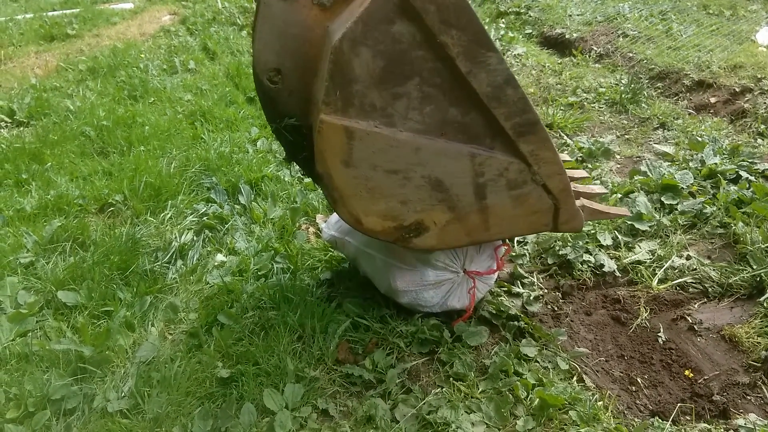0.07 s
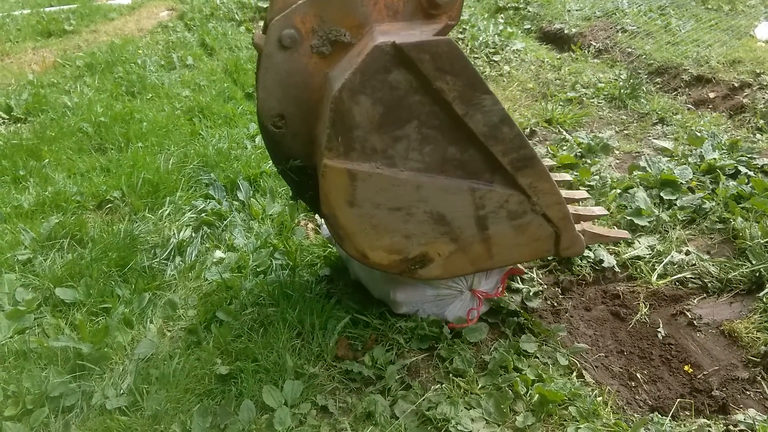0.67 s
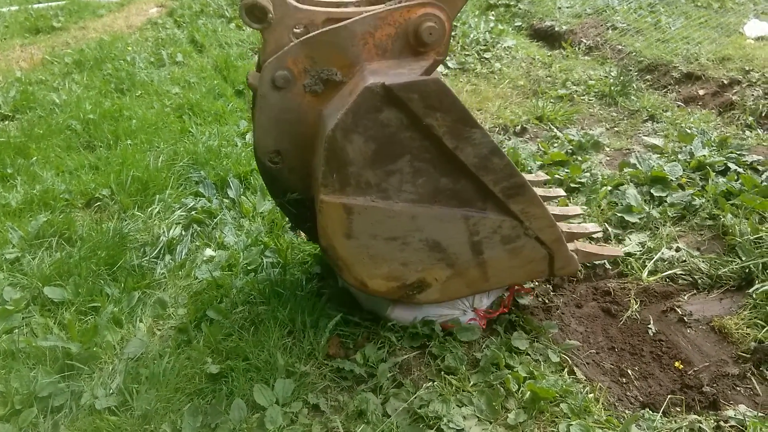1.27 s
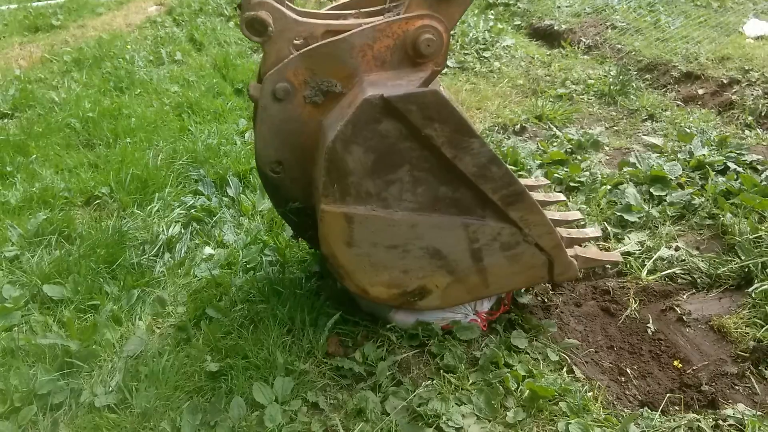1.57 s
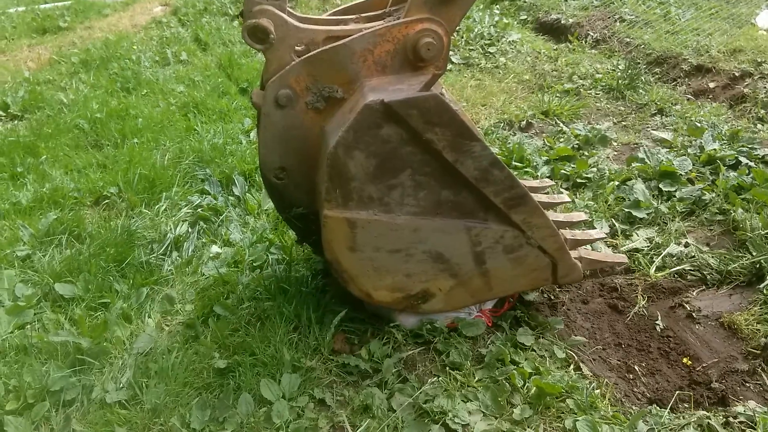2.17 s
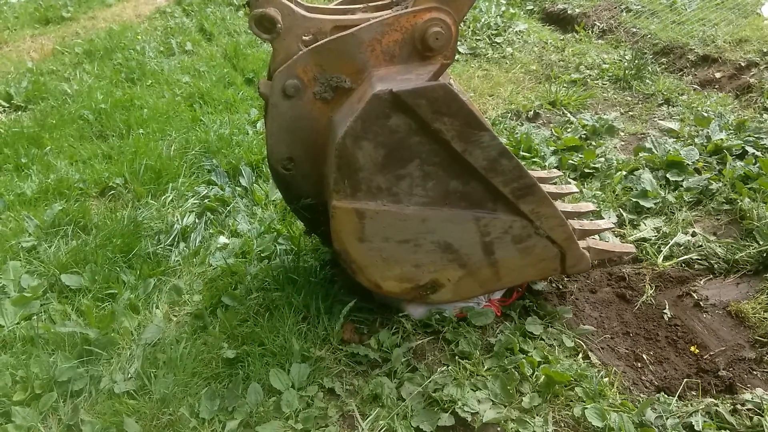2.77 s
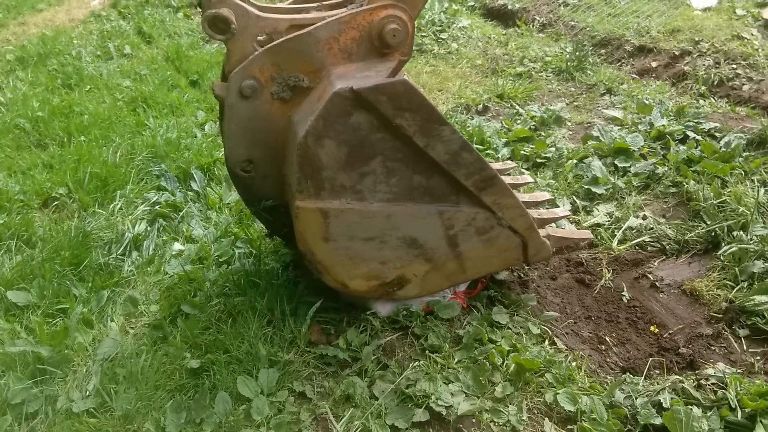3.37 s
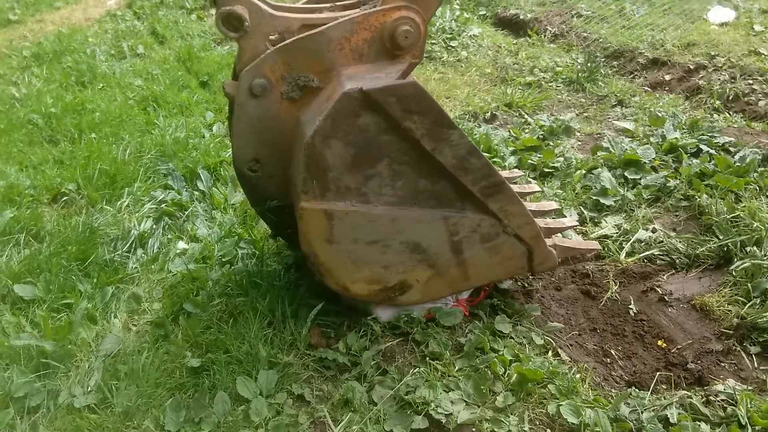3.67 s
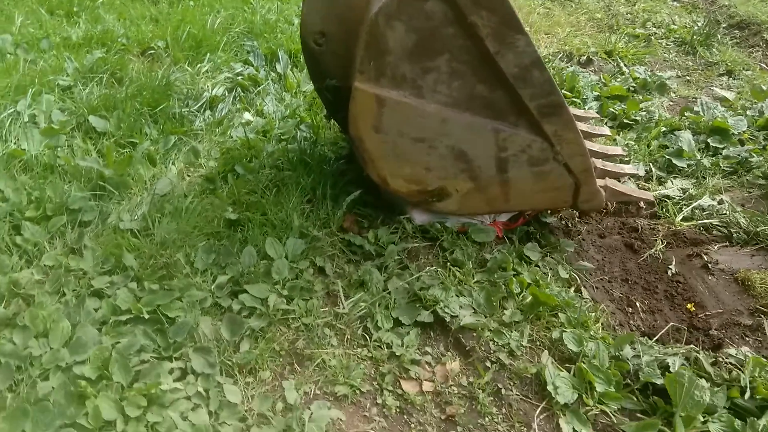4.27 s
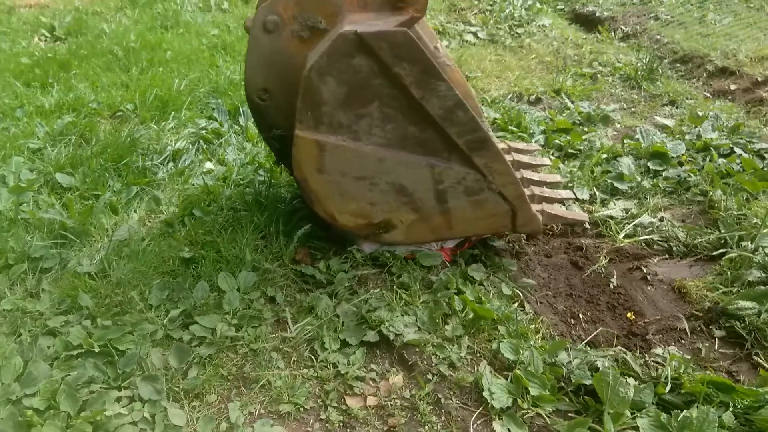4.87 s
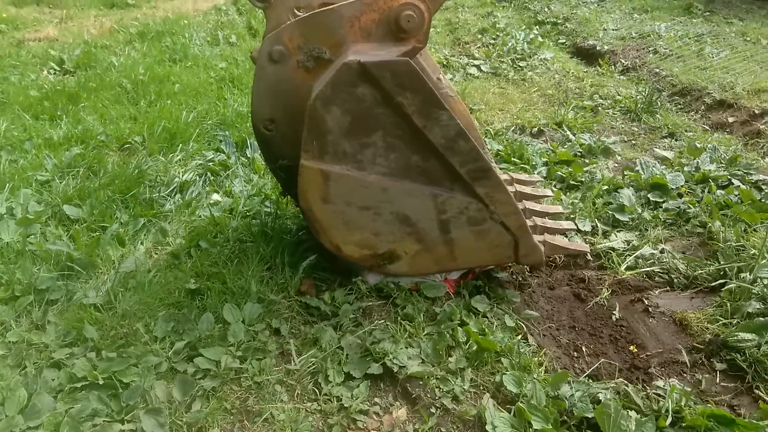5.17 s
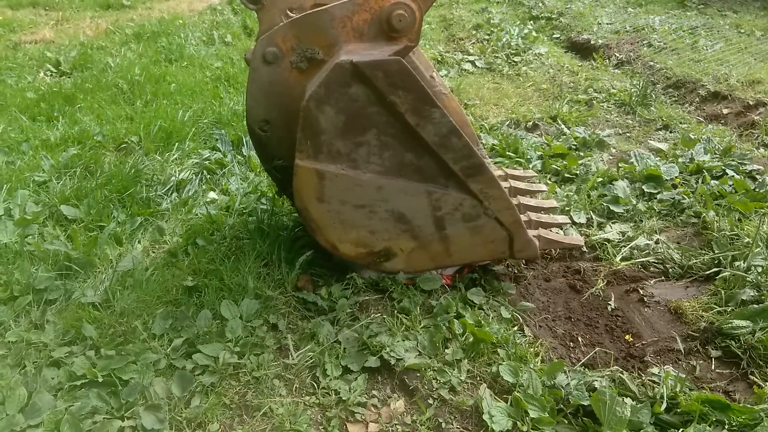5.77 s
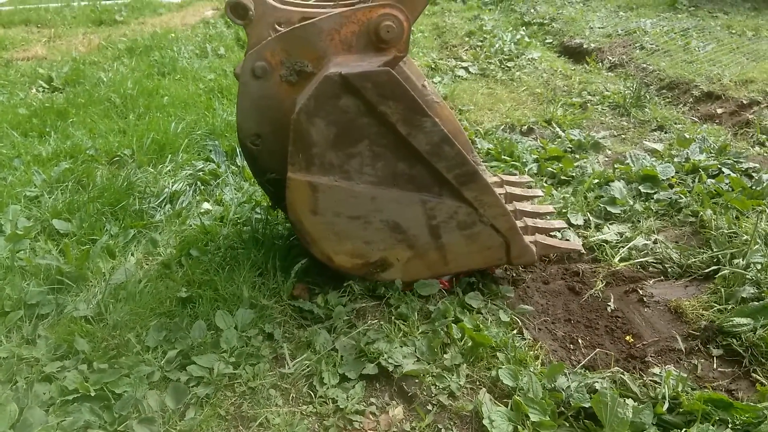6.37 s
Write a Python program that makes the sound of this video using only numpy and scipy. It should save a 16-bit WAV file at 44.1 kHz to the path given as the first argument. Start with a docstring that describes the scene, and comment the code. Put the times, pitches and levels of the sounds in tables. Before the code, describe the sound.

Metal cans crunch and snap under an excavator bucket, over the steady hum of an idling diesel engine.

```python
"""Metal cans crunch, then snap one by one, over the hum of an idling diesel a few metres away.
An excavator bucket is pressing a sack of them flat on a lawn. Many tiny buckles make the dense crunch;
single can walls make the snaps, which the sack and its load damp quickly. Oil hisses through a valve
during two pushes. Near the end the bucket bears on the ground: the hiss grows, the engine slows a little."""
import sys
import numpy as np
from scipy import signal
from scipy.fft import rfft, irfft, next_fast_len
from scipy.io import wavfile
from scipy.ndimage import uniform_filter1d, minimum_filter1d

SR = 44100
rng = np.random.default_rng(int(sys.argv[2]) if len(sys.argv) > 2 else 0)


def pcm_store(signal):
    """Save signal as 16-bit PCM."""
    levels = np.round(np.clip(np.atleast_2d(signal), -1, 1) * 32767)
    wavfile.write(sys.argv[1], SR, levels.astype(np.int16).T)


N = 291942

# tones of the machine's hum, from exhaust and hydraulic pump: multiple_of_crankshaft_rate, idle_db, loaded_db
HUM_TONES = [(2, -9, -10), (3, -12, -14), (3.5, -20, -23), (3.75, -19, -19), (4, 0, 0), (4.5, -26, -20),
             (5, -14, -7), (6, -20, -18), (7, -26, -15), (8, -32, -25), (9, -30, -24), (10, -27, -17),
             (12, -33, -26), (15, -37, -29)]
# rumble of uneven combustion: frequency_hz, level_db
RUMBLE_COLOUR = [(20, -40), (42, -8), (60, 24), (72, -30.5), (105, -3), (135, -0.5), (180, -6.5),
                 (230, -13.5), (300, -11.5), (400, -21), (600, -44)]
# clatter in the engine bay: frequency_hz, level_db
CLATTER_COLOUR = [(88, -32.5), (150, -13), (283, -15.5), (364, -17.5), (416, -20), (477, -19.5), (612, -17),
                  (900, -18), (1540, -28), (1910, -19.5), (2970, -26.5), (3820, -39.5), (4720, -36),
                  (13600, -61), (15000, -79)]
# how wide the clatter sounds: frequency_hz, side_minus_middle_db
CLATTER_WIDTH = [(200, 3.5), (380, -4), (700, -3), (1250, 11), (2400, -8.5), (4400, 2), (8000, 6)]
# which way the engine leans: frequency_hz, left_minus_right_db
ENGINE_PAN = [(200, -1.7), (400, -2), (700, -4), (1300, -1.5), (2400, 1), (8000, 2), (15000, 6)]
# hiss of oil in the valve: frequency_hz, level_db
HISS_COLOUR = [(500, -3), (1500, 8), (3000, 1.5), (4600, 6.5), (6200, 0), (7200, 1.5), (9500, -8.5),
               (12500, 2), (15000, -18.5)]
# the valve is open while the bucket pushes down: start_s, end_s
PUSHES = [(0.12, 2.31), (4.33, 6.9)]
# the sack gives way on the soil: start_s, level_db, pitch_hz
SACK_THUDS = [(1.404, -3, 76), (1.43, -11, 129.1), (1.50, -28, 45), (1.81, -27, 35), (3.775, -18.5, 258)]
# a whole can dents with a hollow pop: start_s, level_db, pitch_hz
CAN_DENTS = [(0.592, -10.5, 766), (1.469, -13, 890), (1.788, -15, 710), (2.048, -13.5, 604),
             (2.878, -23, 735), (4.394, -13, 680), (4.492, -11.5, 535), (4.597, -13.5, 610),
             (5.14, -16, 605), (5.392, -22, 635), (5.622, -7, 605), (5.68, -18, 796), (5.853, -11, 746),
             (6.166, -18.5, 746)]
# crunch of collapsing cans: frequency_hz, level_db
CRUNCH_COLOUR = [(120, -18), (200, -2.5), (244, 3), (338, 1), (443, -11), (671, -6.5), (880, -4.5),
                 (1050, -12.5), (1490, -5.5), (3010, -6.5), (4240, -17.5), (7550, -11), (9380, -20),
                 (13700, -21), (15000, -35)]
# grinding of flattened cans: frequency_hz, level_db
GRIND_COLOUR = [(250, -2), (700, 2), (2000, -5), (4200, 2), (8000, -11.5), (14000, -11)]
# a further squeeze grinds the flat cans together: peak_s, level_db
GRIND_SQUEEZES = [(4.48, -24.5), (5.42, -21.5), (5.87, -25.5), (6.15, -28), (6.6, -48)]
# a can wall buckles: start_s, level_db, body_db, crack_db, wall_pitch_hz
CAN_SNAPS = [(0.3175, -16, -6, -15, 1520), (0.3561, -14, -5, -19, 2780), (0.381, -5.5, -19, -12, 1135),
             (0.4165, -16, -20, -8.5, 1510), (0.5028, -12.5, -17, -7.5, 1650), (0.5921, -7, -6.5, -6, 1820),
             (0.6122, -11, -17, -16, 2220), (0.6313, -1.5, -14, -7, 1320), (0.6444, -9, -18, -7, 2240),
             (0.7512, -7, -10, -6.5, 2620), (0.7851, -7.5, -25, -5.5, 2960), (0.823, -8, -20, -4.5, 3160),
             (0.8827, -10.5, -7, -10, 2030), (0.9, -5.5, -9, -7, 1500), (0.9192, -13, -15, -8, 2470),
             (0.956, -15, -16, -4, 1370), (0.9855, -16, -12, -2, 2550), (1.1235, -7.5, -3, -10, 1760),
             (1.1608, -6.5, -9, -8, 1880), (1.277, -8, -14, -13, 1740), (1.3316, -6, -9, -8.5, 2910),
             (1.4327, -4, -9, -9, 1420), (1.4689, -7.5, -6, -7, 2810), (1.511, -3, -12, -10.5, 2850),
             (1.764, -9, -11, -12, 1880), (1.8049, -10.5, -13, -6, 1880), (1.8407, -10, -13, -12, 1700),
             (1.8809, -18, -18, -11, 1790), (1.9063, -10, -11, -12, 1920), (1.9504, -14, -2, -12, 1540),
             (1.9662, -11.5, -13, -14, 2440), (2.0097, -7.5, -28, -9.5, 1990),
             (2.0457, -18, -7, -3.5, 1910), (2.1276, -24, -6, -6, 1250), (2.2421, -9.5, -18, -9.5, 1525),
             (2.4074, -19.5, -4, -15, 1920), (2.5326, -16.5, -19, -2.5, 2090), (2.5534, -23, -15, -5, 1230),
             (2.6689, -17.5, -8, -6.5, 2400), (2.828, -15, -7, -8, 2130), (2.8779, -10.5, -4, -5.5, 2260),
             (3.1682, -23.5, -5, -9, 2230), (3.1984, -27, -8, -8, 2060), (3.2226, -8, -14.5, -5.5, 1570),
             (3.2902, -23, -16, -7, 1780), (3.3118, -8, -8, -11, 1600), (3.4174, -19.5, -12, -8, 1760),
             (3.686, -10, -23, -15, 1575), (3.7827, -24.5, -3, -10, 2300), (3.8363, -14.5, -17, -11, 2310),
             (3.907, -17.5, -9, -8.5, 2820), (3.9559, -8, -15, -13.5, 3150), (4.052, -9.5, -19, -22, 1790),
             (4.135, -24, -16, -6, 1490), (4.1432, -24.5, -23, -3.5, 1530), (4.2316, -21.5, -17, -13, 2000),
             (4.2602, -15.5, -21, -12, 2300), (4.337, -14, -27, -2.5, 1680),
             (4.3776, -14.5, -6, -7.5, 2950), (4.3939, -10, -4.5, -3, 2060), (4.4518, -17, -9, -11, 2400),
             (4.4763, -12, -19, -8.5, 1480), (4.493, -9.5, -17, -10.5, 2050),
             (4.539, -21.5, 3.5, 0.5, 2100), (4.5528, -11, -16, -8, 2770), (4.5964, -14, -2, -11, 3260),
             (4.674, -15.5, -15, -7.5, 1440), (4.7437, -13.5, -14, -5.5, 1430), (4.8675, -24, -16, 4, 1480),
             (5.1386, -11.5, -20, -4, 1980), (5.3326, -26, -14, 0.5, 1500), (5.3602, -7, -21, -14, 1440),
             (5.3932, -11.5, -8, -9, 1100), (5.4014, -5, -11, -17, 1550), (5.437, -13.5, -5, -6, 2460),
             (5.5048, -15, -8, -7, 1880), (5.569, -13.5, -8, -9.5, 2610), (5.6216, -9, -5.5, -9, 2100),
             (5.6382, -13, -22, -12, 1760), (5.6808, -12, -9, -8.5, 2020), (5.7287, -20, -1, -12, 2060),
             (5.8484, -16.5, 1.5, -2, 1470), (5.883, -20, -2, -9, 1570), (5.892, -13.5, -8, -7, 1600),
             (5.9218, -11, -17, -15, 2470), (5.9693, -12, -26, -12, 3020), (6.1175, -13, 0.5, -7, 2330),
             (6.126, -14, -12, -19, 2160), (6.1656, -11.5, -8, -6.5, 2400), (6.194, -14.5, -23, -15, 1470),
             (6.2348, -14.5, -16, -3.5, 2880), (6.327, -25, -11, -3, 2480),
             (6.4211, -21.5, -11, -0.5, 2430), (6.477, -23, -13, -4, 2430), (6.6082, -14.5, -2, -7, 2000)]
# a snap's hollow body: frequency_hz, level_db
BODY_COLOUR = [(200, -17), (450, -20), (700, -7), (1100, -21.5), (2000, -53)]
# a snap's rattling wall: frequency_hz, level_db
WALL_COLOUR = [(600, -31), (1400, -1), (2800, -4.5), (4300, -8), (6000, -8), (10000, -53)]
# a snap's sharp crack: frequency_hz, level_db
CRACK_COLOUR = [(2000, 1), (4200, -3.5), (6500, 4.5), (9300, 2.5), (12000, 6), (14000, 3), (16000, 0.5)]
# which way the cans and hiss lean: frequency_hz, left_minus_right_db
BUCKET_PAN = [(300, -2), (700, -4), (1300, .5), (2400, 1.5), (4400, 1), (8000, 5.5), (14000, 11)]

TIME = np.arange(N) / SR
AGE = np.arange(4096) / SR  # seconds since one short sound began
SIDES = np.array([[1], [-1]])  # plus for left, minus for right


def undb(db):
    """Turn decibels into a number to multiply by."""
    return 10 ** (np.asarray(db) / 20)


def unit(x):
    """Scale a sound to an average (rms) strength of 1."""
    return x / np.sqrt(np.mean(x ** 2))


def shape(points, size):
    """Read a (frequency_hz, level_db) table at every frequency of a spectrum."""
    hz, db = np.transpose(points)
    return np.interp(np.log(np.fft.rfftfreq(size, 1 / SR) + 1), np.log(hz), db)


def colour(x, points):
    """Give a sound the balance of lows and highs listed in a table."""
    cepstrum = irfft(shape(points, size=2048) * np.log(10) / 20)[:1024]
    cepstrum[1:] *= 2  # makes the filter ring only after a sound, never before
    response = irfft(np.exp(rfft(cepstrum, 2048)))[:1024]
    return signal.fftconvolve(x, response[None], axes=-1)[:, :x.shape[-1]]


def pan(x, points):
    """Lean each frequency of a stereo sound left or right."""
    size = next_fast_len(N)
    return irfft(rfft(x, size) * undb(SIDES * shape(points, size) / 2), size)[:, :N]


def wander(per_s):
    """A smooth random wobble, roughly 1 in size."""
    hold = max(int(SR / per_s), 1)
    steps = np.repeat(rng.standard_normal(N // hold + 1), hold)
    return 1.3 * uniform_filter1d(uniform_filter1d(steps, hold), hold)[:N]


def add(out, start_s, sound):
    """Mix a sound in at its start time."""
    i = int(np.clip(start_s * SR, 0, N - 1))
    out[:, i:i + sound.shape[-1]] += sound[:, :N - i]


def fade(t60, rise):
    """Swell in about `rise` seconds and die away by 60 dB every `t60` seconds."""
    return (1 - np.exp(-AGE / rise)) * undb(-60 * AGE / t60)


def ring(hz, t60, glide, spread):
    """One fading tone; it slides as the material bends and reaches the two sides out of step."""
    turns = hz * (AGE + glide * AGE ** 2 / t60) + spread * rng.standard_normal((2, 1))
    return np.sin(2 * np.pi * turns) * fade(t60, rise=0.00026)


def machine_load(start_s=4.7, takes_s=1.9):
    """Strain on the machine, 0 to 1, as the bucket comes to bear on the ground."""
    return np.clip((TIME - start_s) / takes_s, 0, 1) ** 1.45


def engine(idle_hz=27.56, sag_hz=2.6):
    """Four cylinders hum and rumble, clatter pulses with the crankshaft, and load slows the shaft."""
    load = machine_load()
    shaft_hz = (idle_hz - sag_hz * load) * (1 + .003 * wander(3.07))
    turns = np.cumsum(shaft_hz) / SR
    hum = 0
    for multiple, idle_db, loaded_db in HUM_TONES:
        waver = .08 if multiple in (2, 4) else .22  # the main firing tones are steadiest
        phase = 2 * np.pi * (multiple * turns + rng.random())
        tone = (1 + waver * wander(14)) * np.sin(phase) + waver * wander(15) * np.cos(phase)
        hum = hum + undb(idle_db + load * (loaded_db - idle_db)) * tone
    hum = unit(hum) * undb(-11.5 - load)
    rumble = unit(colour(rng.standard_normal((1, N)), RUMBLE_COLOUR)) * undb(-30 + 5 * load)
    middle, side = colour(rng.standard_normal((2, N)), CLATTER_COLOUR)
    clatter = unit(middle + SIDES * colour(side[None], CLATTER_WIDTH))
    pulse = 1 + .17 * np.cos(6 * np.pi * turns) + .13 * np.cos(4 * np.pi * turns)
    flicker_db = 1.26 * wander(24.64) + 1.23 * wander(160)
    return pan(hum + rumble + clatter * pulse * undb(-30 + flicker_db), ENGINE_PAN)


def valve_hiss(ramp_s=.2, flicker_db=4):
    """Oil hisses through the open valve, louder as the pressure builds."""
    opening = sum(np.clip(np.minimum(TIME - start, end - TIME) / ramp_s + .5, 0, 1)
                  for start, end in PUSHES)
    level_db = -41.5 + 7 * np.minimum(machine_load() / .39, 1)
    hiss = unit(colour(rng.standard_normal((2, N)), HISS_COLOUR))
    return hiss * opening * undb(level_db + flicker_db * wander(30))


def dents_and_thuds():
    """Whole cans dent with hollow pops, and the sack thuds dully on the soil."""
    out = np.zeros((2, N))
    for start_s, db, hz in CAN_DENTS:
        pop = ring(hz, t60=0.034, glide=-0.062, spread=0.049)
        overtone = undb(-7) * ring(1.394 * hz, t60=0.048, glide=-0.086, spread=0.32)
        add(out, start_s, undb(db + 1) * (pop + overtone))
    for start_s, db, hz in SACK_THUDS:
        thud = ring(hz, t60=0.37, glide=-0.31, spread=.01) * (1 - AGE / AGE[-1])
        add(out, start_s, undb(db) * thud)
    return out


def creases(start_s, end_s, points, count, scatter_db, t60, ting_db):
    """A swarm of tiny buckles, each a tick, a wall tone and a high ting, at an even overall level."""
    out = np.zeros((2, N))
    for i, (when, size, pitch, bend, high) in enumerate(rng.random((count, 5))):
        tick = rng.standard_normal((2, len(AGE))) * fade(t60, rise=0.00078)
        tone = undb(-10) * ring(550 * 7 ** pitch, t60=.03, glide=.2 * (bend - .5), spread=.2)
        ting = undb(ting_db) * ring(3800 + 10000 * high, t60=.02, glide=0, spread=.3)
        at_s = start_s + (end_s - start_s) * (i + 2 * when) / count
        add(out, at_s, undb(scatter_db * size ** 3) * (tick + tone + ting))
    middle, side = out.mean(axis=0), (out[0] - out[1]) / 2
    side = colour(side[None], [(200, -18), (600, -8), (1300, 0)])  # low sounds reach both sides alike
    out = colour(middle + SIDES * side, points)
    power = uniform_filter1d(np.mean(out ** 2, axis=0), int(.08 * SR))
    return out / np.sqrt(np.abs(power) + 1e-6)


def grinding(rise_db_per_s=128, fall_db_per_s=77):
    """Flattened cans settle faintly and grind together at each further squeeze."""
    swells = sum(undb(db - np.maximum(rise_db_per_s * (peak_s - TIME), fall_db_per_s * (TIME - peak_s)))
                 for peak_s, db in GRIND_SQUEEZES)
    crackle = creases(2, N / SR, GRIND_COLOUR, count=600, scatter_db=21, t60=.016, ting_db=-8)
    return crackle * (undb(-47) + swells)


def crunch(full_s=.87, thins_s=1.323, stops_s=1.89, gives_s=.585):
    """The sack of cans collapses in a dense crackle, brighter when louder."""
    effort_db = -24.5 * np.maximum(full_s - TIME, 0)  # swells, then holds
    effort_db -= 7.5 * np.maximum(TIME - thins_s, 0)  # the cans run out of room
    effort_db -= 33 * np.maximum(TIME - stops_s, 0)  # the bucket stops
    effort_db[(TIME > gives_s) & (TIME < gives_s + .066)] = .5  # the top cans give way all at once
    effort_db = uniform_filter1d(effort_db, size=220) + .97 * wander(45)  # the pile sinks in jerks
    crackle = creases(.31, 2.35, CRUNCH_COLOUR, count=1150, scatter_db=14, t60=.018, ting_db=-9)
    lows = signal.sosfiltfilt(signal.butter(2, 4200, fs=SR, output="sos"), crackle)
    highs = (crackle - lows) * undb(4 + .72 * effort_db)
    return (lows + highs) * undb(-17.5 + effort_db)


def fold(points, t60, rise, tail_db):
    """Noise of crumpling sheet: each fold has its own colour, gives in jerks and leaves a faint tail."""
    hz = np.fft.rfftfreq(len(AGE), 1 / SR)
    patches_db = 3.5 * np.interp(hz, np.linspace(0, SR / 2, 48), rng.standard_normal(48))
    spectrum = rfft(rng.standard_normal((2, len(AGE))))
    noise = unit(irfft(spectrum * undb(shape(points, size=len(AGE)) + patches_db)))
    jerks = np.interp(AGE, np.linspace(0, AGE[-1], 90), rng.standard_normal(90))
    decay = fade(t60, rise) + undb(tail_db) * fade(t60=1.0, rise=0.0035)
    soft_end = 1 - (AGE / AGE[-1]) ** 2
    return noise * undb(3 * np.tanh(jerks)) * decay * soft_end


def snaps():
    """Each buckle cracks, rattles the can's wall and body, rings two tones and leaves a small crinkle."""
    out = np.zeros((2, N))
    for start_s, db, body_db, crack_db, hz in CAN_SNAPS:
        bend, apart, late = rng.random(3)
        tones = ring(hz, t60=0.036, glide=0.079 * (bend - .5), spread=0.17)
        tones += 0.32 * ring(hz * (1.1 + .5 * apart), t60=0.028, glide=0, spread=0.66)
        tones *= undb(-8 - .42 * crack_db)  # the sharper the crack, the less the wall rings
        hollow = fold(BODY_COLOUR, t60=0.061, rise=0.00076, tail_db=-29)
        body = undb(body_db - 4) * (hollow + hollow[::-1] / 2)  # low sounds reach both sides
        wall = undb(-6) * fold(WALL_COLOUR, t60=0.046, rise=0.0002, tail_db=-23)
        crack = undb(crack_db + 6) * fold(CRACK_COLOUR, t60=0.036, rise=0.00082, tail_db=-34.5)
        add(out, start_s, undb(db) * (body + wall + crack + tones))
        # the fresh fold gives way once more, just after its snap
        crinkle = rng.standard_normal((2, len(AGE))) * fade(t60=0.027, rise=0.00086)
        add(out, start_s + .013 + .022 * late, undb(db + crack_db - 12) * crinkle)
    return out


def scene():
    """Cans and valve hiss lean left in the treble; the engine fills both sides."""
    cans = snaps() + dents_and_thuds() + crunch() + grinding()
    return pan(cans + valve_hiss(), BUCKET_PAN) + engine()


def record(dry, top_hz=14500):
    """A fast limiter turns the biggest snaps down to full scale; the highest treble is cut."""
    gain = 1 / np.maximum(np.abs(dry), 1)
    gain = uniform_filter1d(minimum_filter1d(gain, size=33), size=33)
    return signal.sosfilt(signal.ellip(8, .2, 70, top_hz, fs=SR, output="sos"), dry * gain)


dry = scene()
out = record(dry)
pcm_store(out)
```